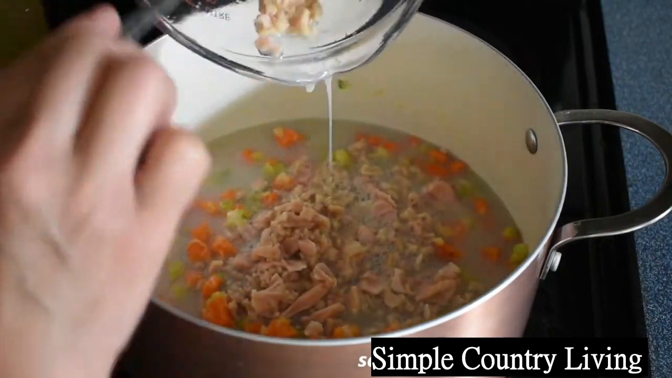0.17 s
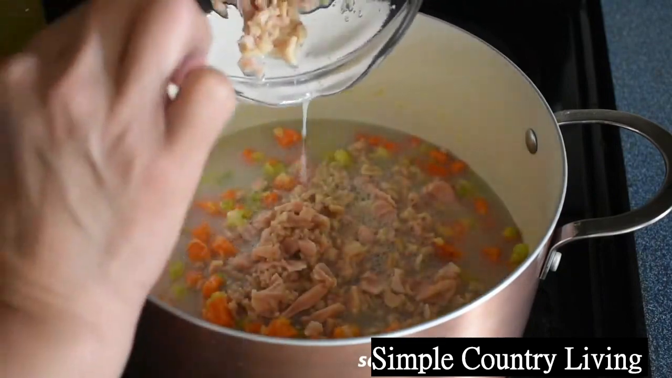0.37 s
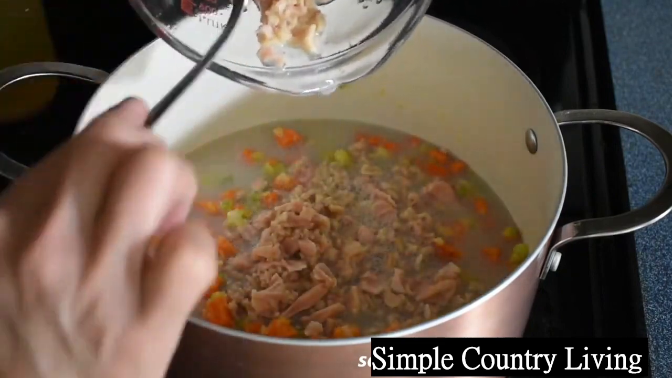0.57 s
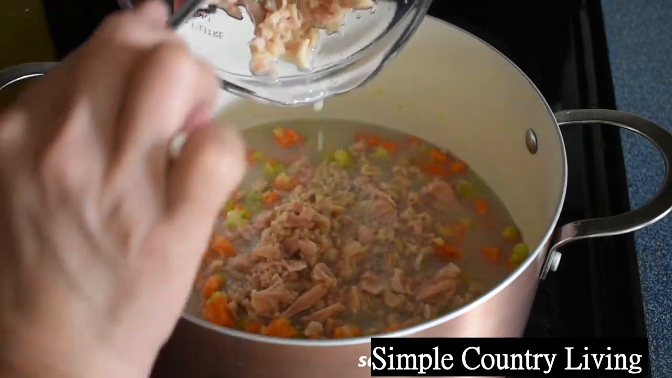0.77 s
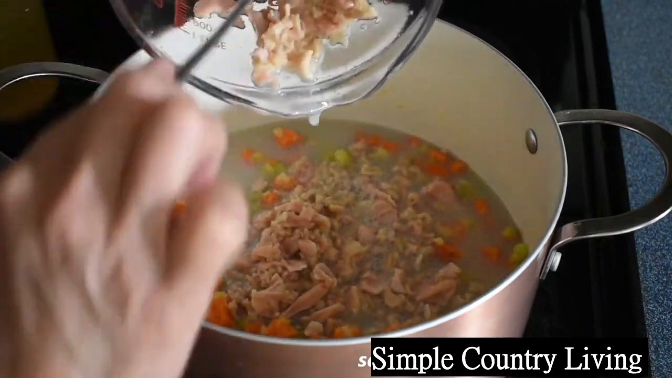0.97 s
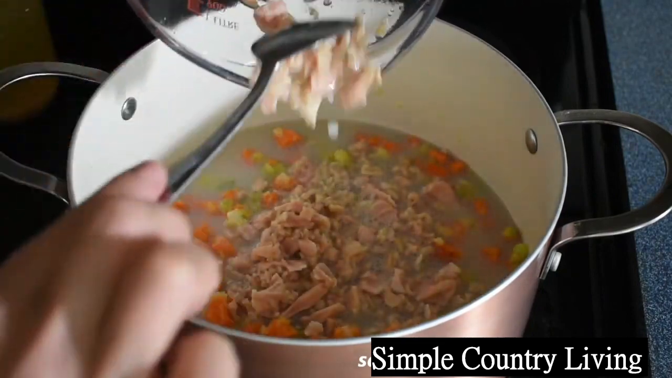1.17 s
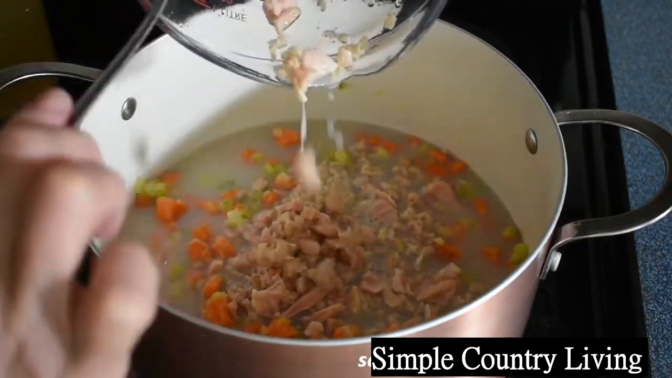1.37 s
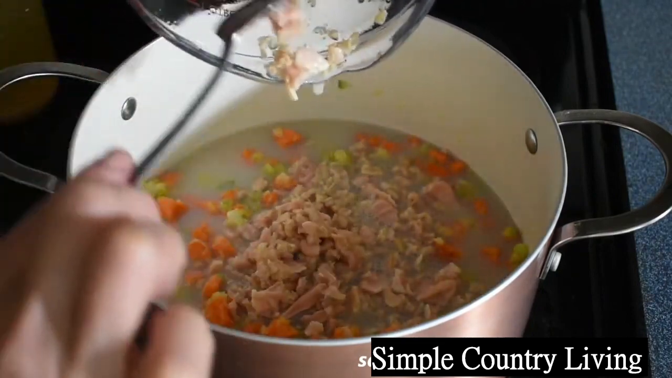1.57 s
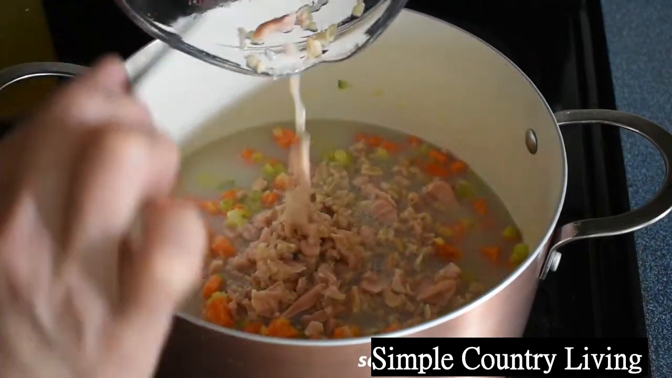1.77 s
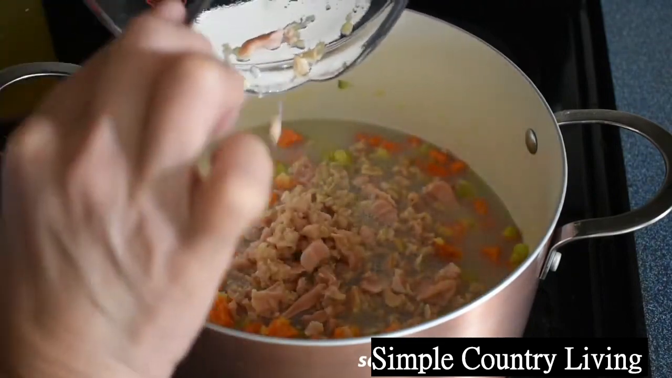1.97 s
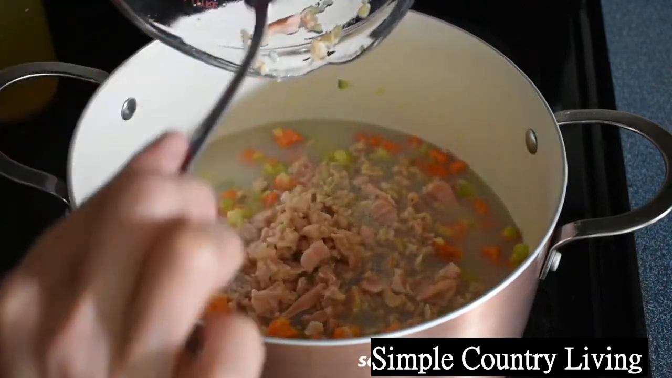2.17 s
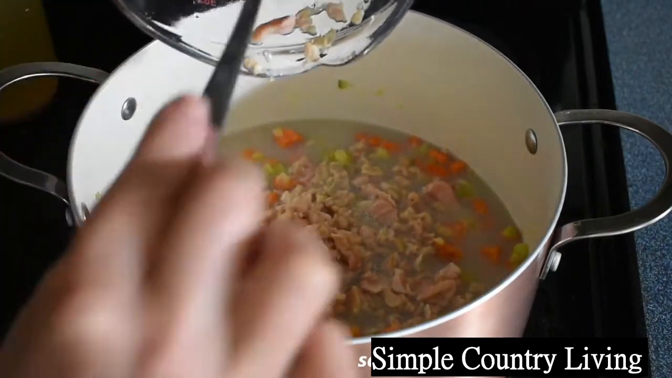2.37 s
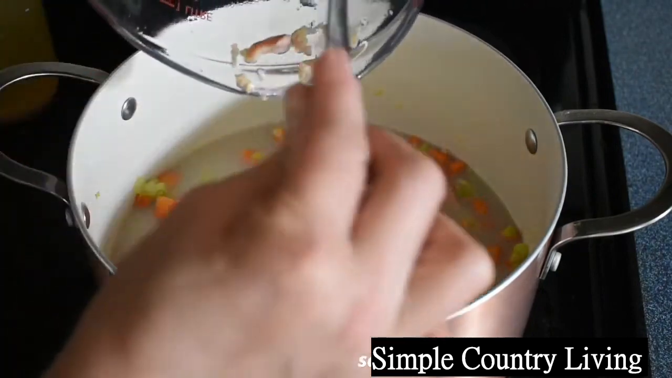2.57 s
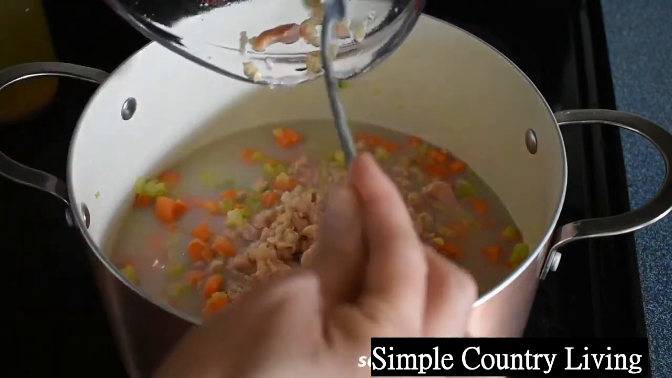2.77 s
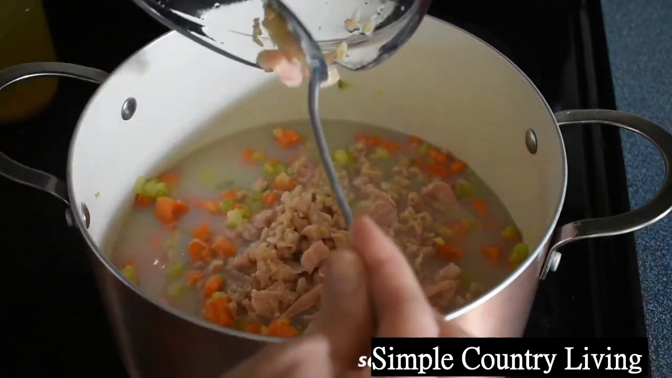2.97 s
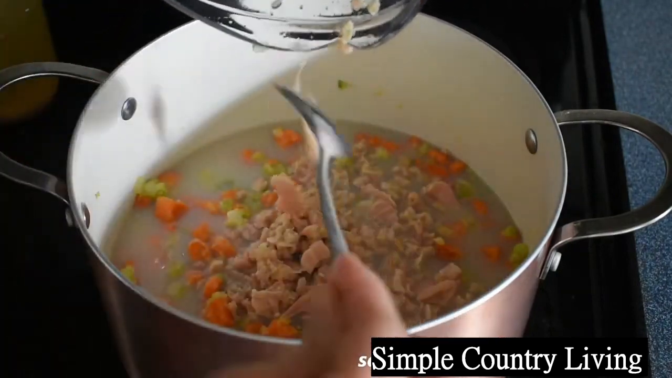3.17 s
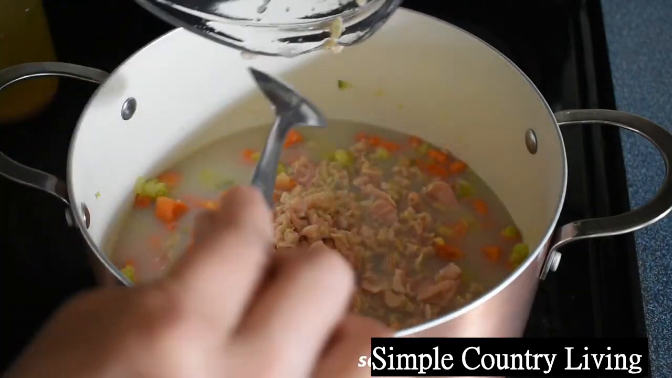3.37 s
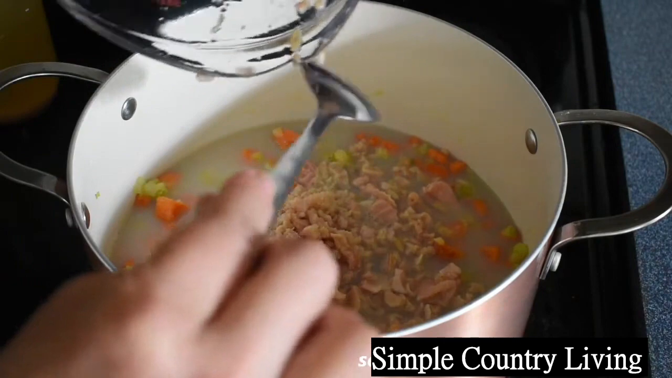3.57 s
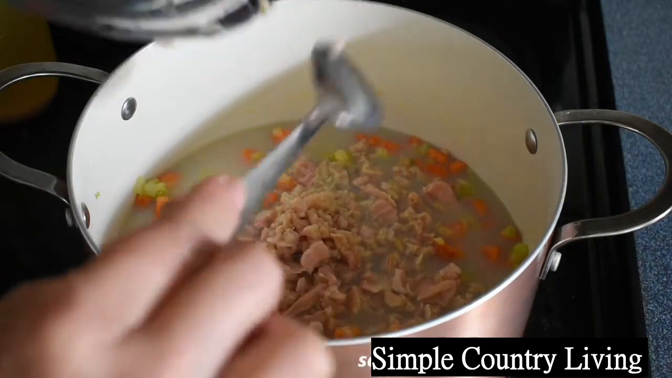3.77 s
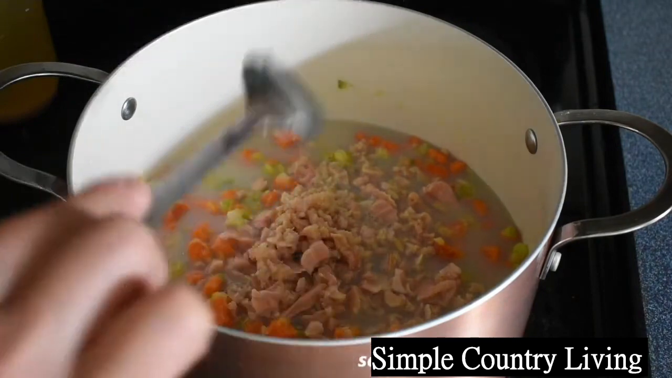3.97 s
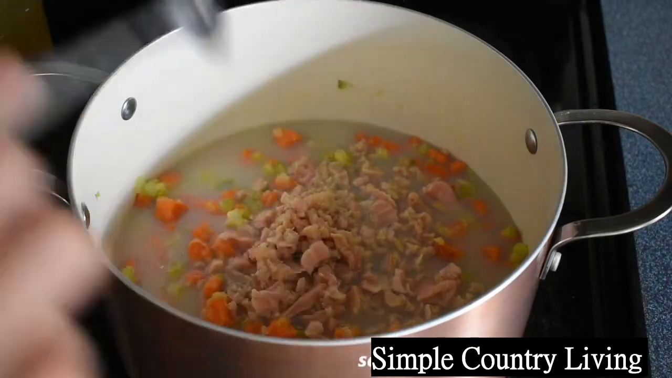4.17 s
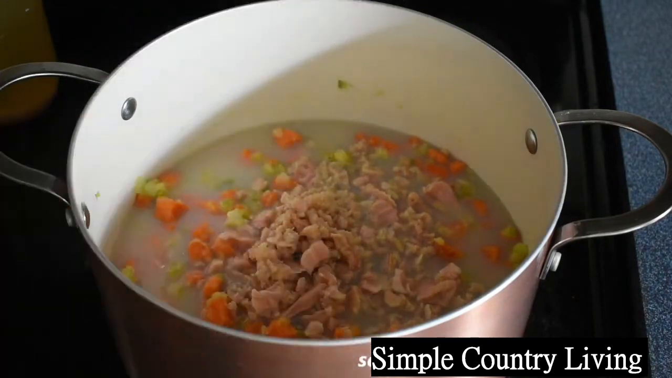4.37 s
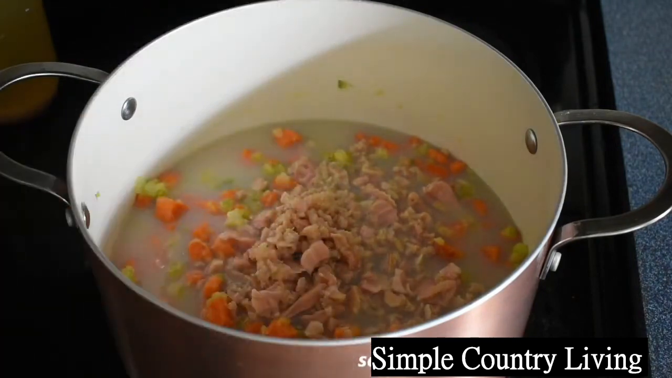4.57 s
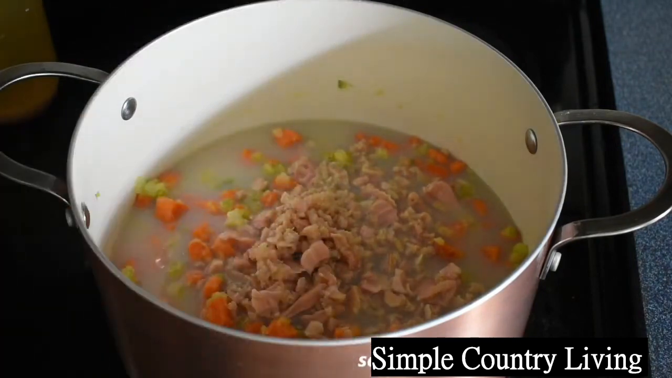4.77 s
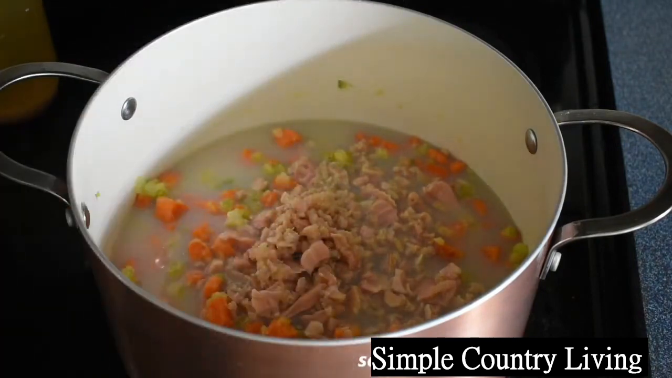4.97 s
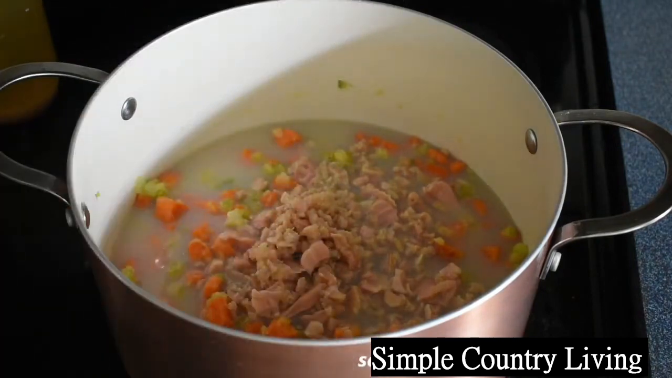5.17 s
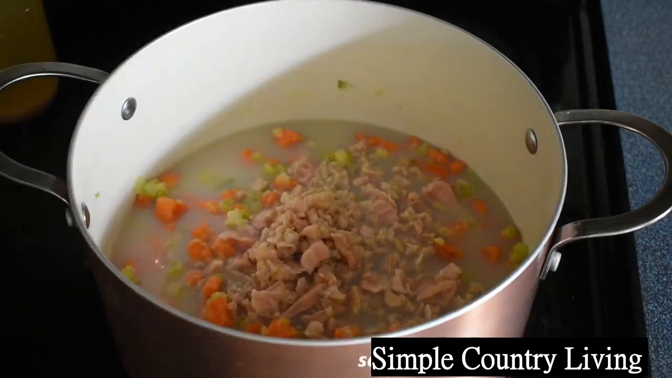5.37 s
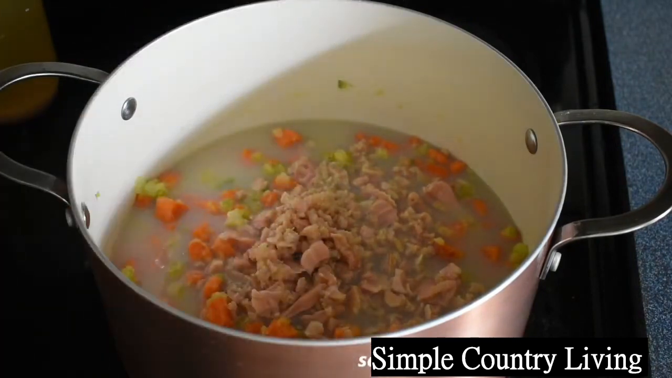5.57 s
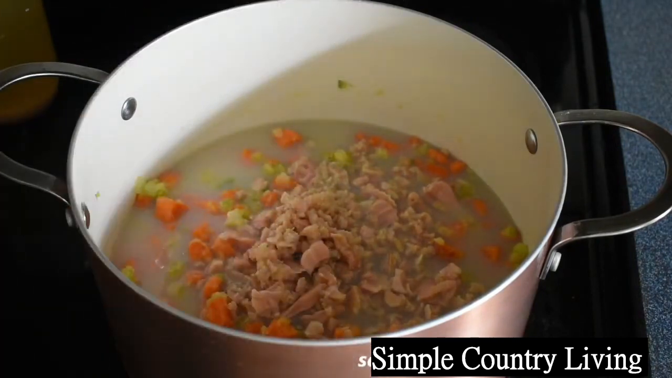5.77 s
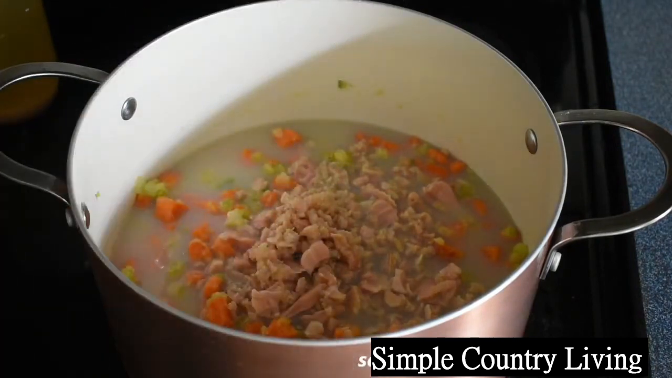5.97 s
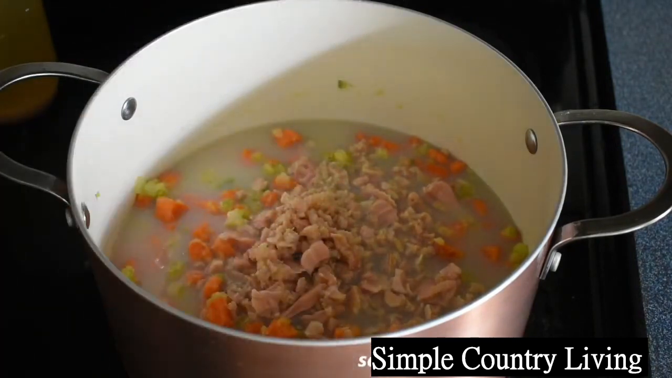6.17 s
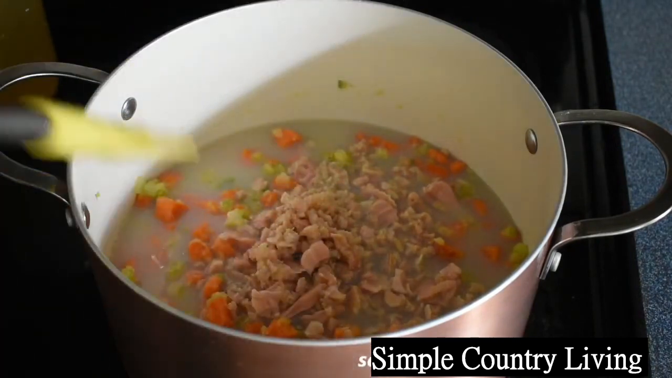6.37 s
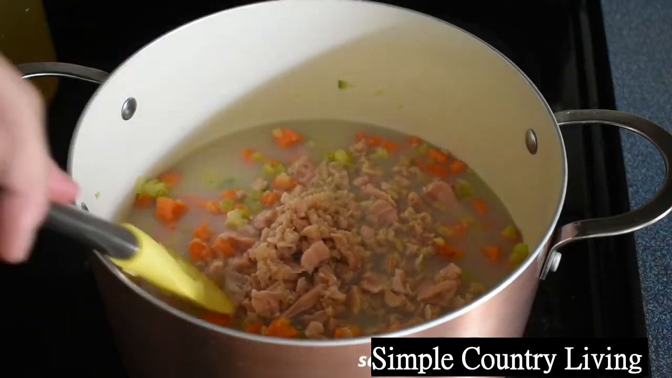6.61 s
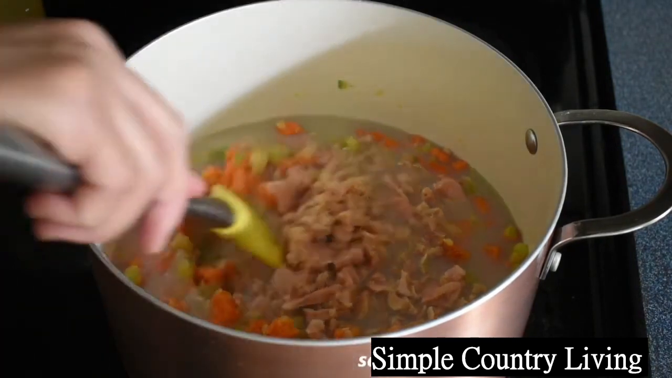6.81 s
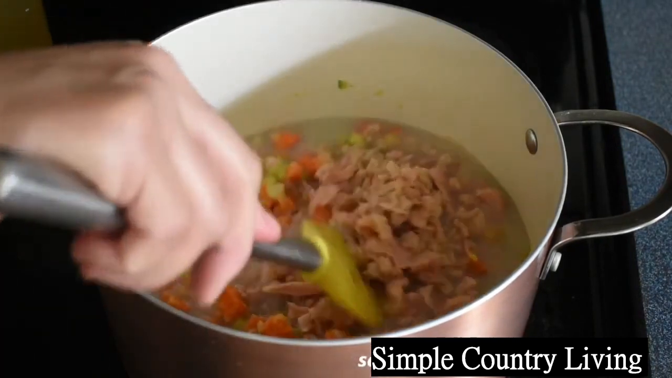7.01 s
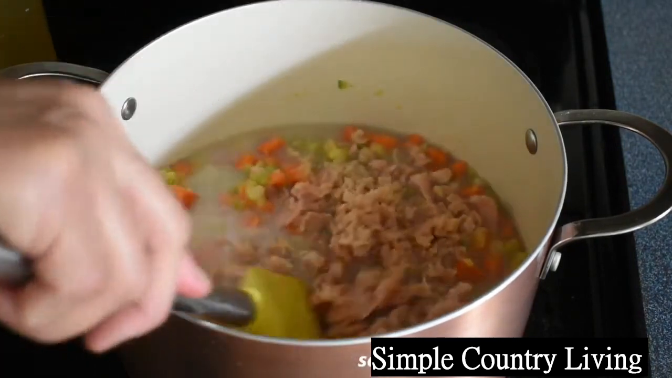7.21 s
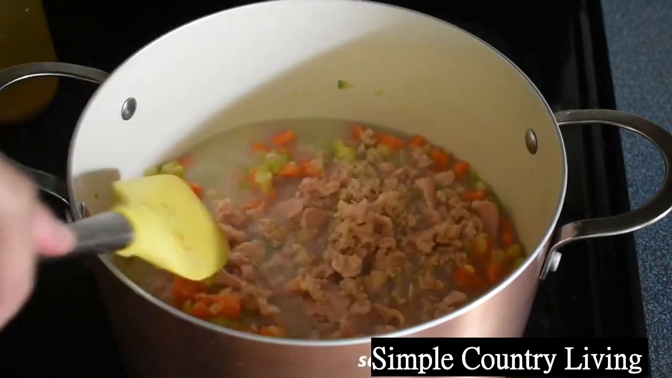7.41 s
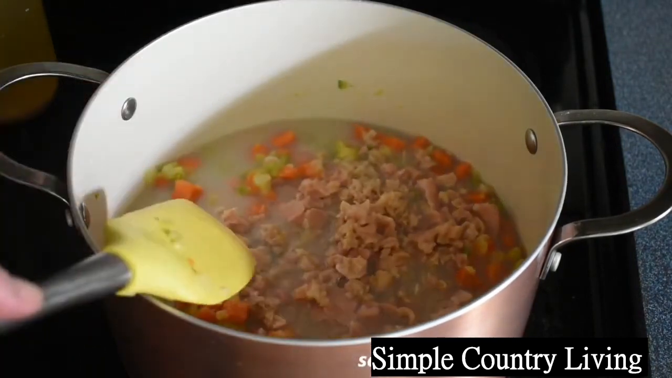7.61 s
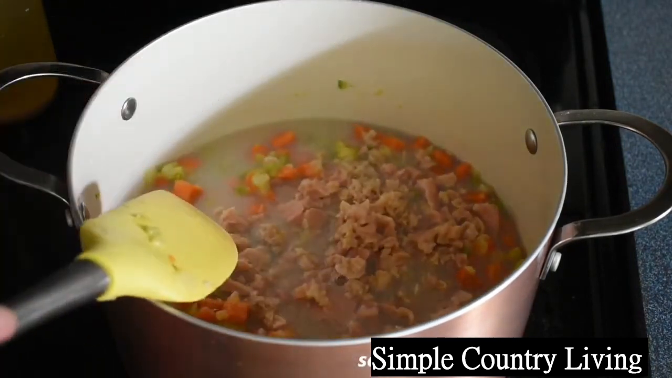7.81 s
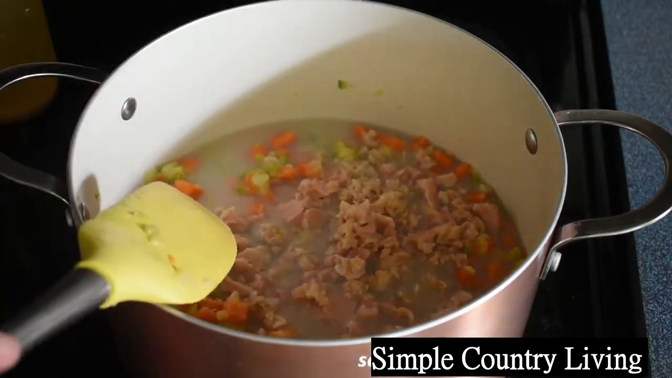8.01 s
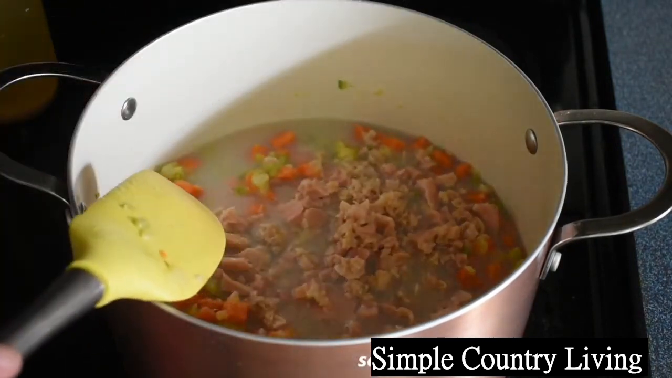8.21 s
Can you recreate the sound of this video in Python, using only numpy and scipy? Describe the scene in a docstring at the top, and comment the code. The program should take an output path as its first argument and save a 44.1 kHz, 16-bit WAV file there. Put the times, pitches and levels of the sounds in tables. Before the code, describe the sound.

A close microphone in a small, hard kitchen picks up quiet room tone and a very faint steady hum throughout. From 0.3 s a steel spoon taps a glass bowl with bright, quickly damped clinks, the main ones near 0.3, 0.8, 1.3, 1.9 and 2.4 s. Tiny gritty scrapes and squeaks fall between them, clustering around 0.4, 1.35 and 2.8-3.0 s, with a last lighter clink near 3.4. Near quiet follows until 4.77, when the spoon strikes the bowl with a bright ring, then slides down the glass, gritty and singing, swelling from 4.95 to 5.2. Faint brushing and dull worktop knocks begin at 5.5; a very hard, sharp knock at 6.1 jingles the loose spoon. From 6.5 to 7.0 muffled thuds mix with low, soft spatula bumps in the full pot and slight jingles. Weak bumps around 7.5-7.9 and faint brushing near 8 s finish it.

```python
"""A steel spoon clinks on a glass bowl and scrapes food out over a soup pot, close by in a small kitchen.
The dropped spoon then strikes the bowl and slides down its wall. Worktop knocks follow and jingle it,
among soft brushing; a spatula bumps the pot as stirring begins. Hum and room tone run throughout.
Struck bodies are sums of decaying modes plus noise; rubbing is stick-slip pulses and fluttering tones."""
import sys
import numpy as np
from scipy import signal
from scipy.fft import rfft, irfft
from scipy.io import wavfile
from scipy.ndimage import uniform_filter1d, minimum_filter1d

SR = 44100
rng = np.random.default_rng(int(sys.argv[2]) if len(sys.argv) > 2 else 0)


def generate_wav(signal):
    """Clip the signal to [-1, 1] and save it as 16-bit WAV at the path in sys.argv[1]."""
    frames = np.transpose(np.atleast_2d(signal))
    scaled = np.clip(frames, -1, 1) * 32767
    pcm = np.round(scaled).astype(np.int16)
    wavfile.write(sys.argv[1], SR, pcm)


N = 363825
RING_S = .6
T_S = np.arange(int(RING_S * SR)) / SR
STROKE_T_S = T_S - RING_S / 2  # zero at mid-buffer

# room tone colour: freq_hz, level_db
AIR_COLOUR = [(15, -57.5), (25, -19.5), (64, -7.5), (223, -6.5), (270, -8), (354, -5), (384, -6),
              (416, -11.5), (451, -9.5), (607, -9), (695, -9), (754, -10.5), (1020, -11.5), (4870, -18.5),
              (16000, -29)]
# room echo bands: freq_hz, level_db
ECHO_BANDS = [(150, -11), (500, -12.5), (1500, -9.5), (4000, -14), (10000, -15)]
# ring time of each echo band: t60_s
ECHO_T60_S = [.45, .48, .52, .41, .32]
# soft utensil brushing: centre_s, width_s, level_db, centre_hz
RUSTLES = [(5.623, 0.023, -55.5, 1260), (6.908, 0.01, -57, 2510), (7.102, 0.012, -59.5, 5040),
           (7.873, 0.017, -54, 1460), (8.024, 0.013, -59.5, 1767)]
# low modes of the full pot on its hob: freq_hz, level_db, t60_s
POT_MODES = [(74.4, -6, 0.25), (119.1, -1, 0.19), (134.7, -11.5, 0.075), (211.9, -1, 0.21),
             (250.5, -36, 0.15), (300, 6.5, 0.1), (340.4, 3, 0.22), (434, -6, 0.24)]
# soft bumps in the pot: start_s, level_db, contact_s
BUMPS = [(1.055, -59, 0.011), (6.466, -49.5, 0.017), (6.561, -44.5, 0.043), (6.81, -60, 0.049),
         (7.453, -50, 0.079), (7.665, -54, 0.031), (7.891, -65, 0.067)]
# worktop modes, heavily damped: freq_hz, level_db
WORKTOP_MODES = [(120, -14.5), (225, -1), (255, 4), (345, -3), (372, 6), (430, 6.5), (520, -6), (577, -6.5),
                 (653, 7.5), (730, 3.5), (800, -3.5), (930, 0), (1080, 0.5), (1150, 1), (1355, 0.5),
                 (1840, -3), (2230, -8)]
# knock noise colour: freq_hz, level_db
THUD_COLOUR = [(40, -26), (110, -1.5), (240, -2.5), (400, 10), (700, 11.5), (1200, 7), (2000, 2),
               (4000, -7), (8000, -29), (16000, -22.5)]
# spoon lying loose in the bowl: freq_hz, level_db, t60_s
LOOSE_SPOON_MODES = [(2610, 9, .11), (2890, 2, 0.15), (3585, 2, 0.11), (3870, -1.5, .1), (4450, -9, 0.13),
                     (4870, 3.5, .08), (5000, -2, .12), (5780, -5.5, 0.12), (6480, -8.5, 0.35),
                     (7144, -16.5, .25), (7820, 1, .12), (9170, -6.5, 0.25), (10110, -14, .14),
                     (10550, -9, .14), (10720, -8, .14), (12700, -16.5, .1), (13400, -15, .12)]
# worktop knocks: start_s, level_db, dull_above_hz, contact_s, jingle_db, favoured_hz, lift_db
KNOCKS = [(5.503, -51.5, 3500, 0.0037, -70, 2870, 5), (5.731, -55, 870, 0.0041, -73, 2870, 1),
          (5.9325, -33.5, 900, 0.0025, -76, 2870, -2), (5.943, -33, 490, 0.013, -79, 2870, 0),
          (6.0995, -5.5, 4670, 0.00021, -37, 3960, 12), (6.125, -28, 4000, 0.029, -33, 2610, -8.5),
          (6.557, -31.5, 800, 0.0039, -77, 2870, 6), (6.566, -21, 1196, 0.0053, -46.5, 4880, 0),
          (6.811, -33.5, 900, 0.0094, -59.5, 2870, 7), (6.829, -34.5, 600, 0.023, -70, 2870, -4),
          (6.93, -33.5, 1210, 0.015, -49, 3585, 8), (6.947, -26.5, 1160, 0.01, -45.5, 3585, 1),
          (6.974, -31.5, 904, 0.021, -54, 3585, 2), (8.015, -48.5, 2260, 0.01, -86.5, 2870, 1)]
# glass bowl: freq_hz, struck_db, free_t60_s, sliding_db
BOWL_MODES = [(1051, -7, 0.078, -20.5), (2566, -9.5, .11, -22), (2650, -11, .05, -22),
              (2832, -0.5, 0.13, -12.5), (3000, -4, .06, -24), (3313, -6.5, 0.041, -17),
              (4720, -8, 0.092, 0), (4895, -6.5, 0.083, -3.5), (4992, -1.5, 0.035, -18.5),
              (5650, -7, .06, 2), (6362, -14.5, 0.12, 1), (6540, -8.5, 0.12, -20), (7000, -16.5, .11, -2),
              (7950, -11.5, 0.19, 0.5), (8044, -5.5, 0.092, -13), (8650, -14, 0.18, -9.5),
              (8830, -7, .12, -7), (10096, -4.5, .06, -3), (10650, -13.5, 0.098, -2),
              (10300, -3.5, 0.23, -15), (11150, -2.5, 0.069, -2.5), (11230, -2.5, .06, -5),
              (11700, -6.5, .07, -3.5), (12100, -13.5, 0.29, -7), (12600, -11.5, 0.12, -11),
              (12554, -14.5, 0.36, -10), (13300, -6.5, 0.11, -16), (13800, -8.5, .04, -15),
              (16200, -13, .12, -17.5)]
# steel spoon: freq_hz, struck_db, free_t60_s, sliding_db
SPOON_MODES = [(590, -27.5, 0.074, -18), (1397, -24, 0.092, -23.5), (1812, -18, .11, -10),
               (1885, -5, 0.04, -28.5), (2370, -13, 0.086, -16.5), (2990, -10, .09, -27),
               (3326, -13, .1, -9), (4010, -17.5, .1, -17), (4510, -11.5, 0.069, -33),
               (5310, -6, .06, -21.5), (5396, -15.5, .14, -2), (6430, 2, 0.066, -20),
               (6310, -5.5, 0.069, -10), (7143, -7.5, 0.17, -10.5), (7288, -6.5, 0.2, -4.5),
               (8140, -1.5, 0.058, -16.5), (9400, -3, .04, -10.5), (9590, -12.5, 0.19, -9.5),
               (9860, -2.5, 0.043, -20), (11170, -4.5, 0.089, -20.5), (14300, -11, 0.27, -11.5),
               (15400, -12, .1, -6), (16000, -19.5, .08, -13)]
# steel-on-glass noise colour: freq_hz, level_db
CRACK_COLOUR = [(60, -15.5), (300, -26), (800, -5), (1800, 7.5), (3000, 7.5), (4000, 10), (5500, 11),
                (7500, 6), (10500, 5.5), (13000, -2.5), (16000, -11)]
# slide down the wall: time_s, friction_db, low_resonance_db, high_resonance_db
SLIDE_PATH = [(4.819, -35.5, -46.5, -42), (4.882, -55.5, -55.5, -55.5), (4.95, -41.5, -43.5, -39.5),
              (4.99, -31, -44, -27.5), (5.032, -27, -51, -30), (5.098, -23, -37, -35.5),
              (5.134, -26, -57, -37.5), (5.175, -21, -45.5, -50.5), (5.213, -30.5, -31, -33.5),
              (5.241, -43, -43, -46.5)]
# spoon pressed on the glass: freq_hz, level_db
PRESSED_MODES = [(1950, -10), (2900, 1.5), (3480, -6), (4200, -10.5), (5650, -2.5), (8350, -4),
                 (10450, -10), (11300, -7), (15000, -14.5)]
# strokes: peak_s, half_length_s, level_db, bowl_over_spoon_db, tilt_db_per_octave,
#          squeak_hz, glide_share_per_s, squeak_db
SCRAPES = [(0.332, 0.021, -51.5, -5, -4, 2340, -0.27, -43), (0.412, 0.01, -46, -18, 3, 1416, -0.54, -47),
           (0.432, 0.01, -38.5, -10, 1.5, 1340, -1, -46.5), (0.408, .012, -58, -5, 0, 5420, 1, -46.5),
           (0.441, 0.016, -55, -6, 0, 5600, 0.26, -38), (0.496, 0.013, -41, -3, -1, 2810, -1.8, -44),
           (0.901, 0.051, -58, -5, 1.5, 1415, 0.51, -55), (0.963, 0.014, -50.5, -9, -1.5, 1387, -0.55, -47),
           (1.075, 0.058, -70, 7.5, 2, 11200, -0.073, -62), (1.349, 0.02, -56, 11, -10, 3030, -1.46, -32),
           (1.354, 0.0067, -50, 2, 5, 10300, 0.46, -29.5), (1.404, 0.0074, -74, 3, -2, 2830, 0, -36),
           (1.48, 0.0081, -52, -7.5, -2, 4840, 0, -42.5), (1.996, 0.04, -51.5, -11, 5, 1425, 1.5, -54),
           (2.122, 0.07, -62.5, 2.5, 5, 11200, 0.33, -63),
           (2.738, 0.028, -66.5, 13.5, 4, 1650, -0.7, -59.5),
           (2.816, 0.019, -53, -6, -8, 1655, -0.39, -42.5), (2.827, 0.015, -55.5, 4, 2, 4900, .5, -37.5),
           (2.855, 0.018, -48, -1, -3.5, 1660, 1.1, -42.5), (2.856, 0.012, -50, 1.5, 1, 4910, 0.26, -29),
           (2.916, 0.013, -51, -26, -7, 1663, 3.3, -42), (2.917, 0.021, -61, 2, 3, 4900, -0.064, -38.5),
           (2.943, 0.0093, -37, -1, -4.5, 1634, 0.6, -40.5), (2.97, 0.02, -52, -2, 0.5, 5000, -0.25, -44),
           (2.995, 0.0082, -55, 6, 1, 1900, 0.75, -50), (3.064, 0.019, -70, 5.5, 1, 2804, 0.23, -52),
           (3.427, 0.03, -51, 7.5, 1.5, 10750, 0.21, -40)]
# blows on the bowl: start_s, level_db, spoon_over_bowl_db, tilt_db_per_octave, favoured_hz, lift_db
CLINKS = [(0.2866, -19.5, 18.5, -1, 7290, 4.5), (.428, -43.5, 8.5, 2, 8080, 9),
          (0.4463, -46, 2, 3, 4900, 15), (.469, -52, -0.5, 7, 5690, 9), (0.488, -55.5, -5, -4.5, 2850, 8),
          (0.76, -25.5, 11.5, 0, 7143, 21.5), (0.958, -48.5, 3.5, 1.5, 2850, 12.5),
          (1.27, -63.5, 5.5, 1.5, 6400, 13.5), (1.3007, -24, -12.5, -2, 4950, 20),
          (1.3526, -34, -27, -3, 4950, 20.5), (1.36, -44, -14.5, -9.5, 1050, -13),
          (1.382, -47, -6.5, -2, 2850, 22), (1.548, -55, -17.5, -3, 4917, 13),
          (1.781, -65.5, 2, 10.5, 11200, 4.5), (1.8625, -22, 13.5, 0, 11170, 11),
          (1.885, -37, 7, 7, 1890, 8), (2.049, -48.5, -0.5, 1.5, 5690, 16),
          (2.207, -65, -11, -2.5, 11290, 22.5), (2.4411, -22, -23.5, 0.5, 10713, 10.5),
          (2.462, -37, -6, -1, 11120, 11), (2.806, -52, 4, -3.5, 3010, 30), (2.909, -56, 8, 3, 3010, 32.5),
          (2.937, -44.5, 5.5, -3.5, 2850, 16.5), (2.949, -56.5, -20, -4.5, 2850, 26.5),
          (3.055, -56.5, -0.5, -6, 2850, 13.5), (3.375, -35, -4, 1.5, 11300, 13),
          (3.531, -58, -14.5, 4, 1049, 15.5), (3.558, -60.5, -2, -7, 1049, -1),
          (4.7663, -22.5, 15.5, -0.5, 7290, 23), (4.824, -47.5, -19, 1.5, 2860, 16.5),
          (5.025, -40, -10, 1.5, 4917, 22.5)]

TOP_HZ, LIMITER_CEILING = 15900, .58
PIVOT_HZ = 5650  # mode tilts turn about this
AIR_DB = -64
WORKTOP_T60_S, THUD_T60_S = .07, .042
RATTLE_DB, RATTLE_T60_S = 1, .05  # noise of the jolted spoon, over its modes
GRIT_T60_S, CRACK_T60_S = .03, .013  # noise of one slip, of one blow
SLIDE_LOW_HZ, SLIDE_HIGH_HZ = 2860, 4890  # singing bowl resonances
SLIDE_SHARPNESS = 120  # pitch / flutter cutoff
SLIDE_TILT_DB_PER_OCTAVE, SLIDE_BRIGHTENS_DB_PER_OCTAVE_PER_S = -1, 6  # tilt at midway; its rise
SLIDE_GRIT_DB = -.5  # noise over modes
SLIDE_LOWEST_HZ = 330  # skid noise cut below this
SLIDE_RING_SHARE = .75  # of the free t60, while rubbing
SCRAPE_GRIT_DB = -2  # noise over bowl modes
PRESSED_SHIFT_SHARE = .018  # scatter of mode pitch between strokes
GLIDE_LIMIT_HZ = 2420  # modes above glide no faster than this one
SQUEAK_STEADY, PRESSED_STEADY = .9, .5  # steady tone over flutter
CRACK_OVER_RING_DB = 4
THUMP_DB, THUMP_T60_S = -2.5, .055
THUMP_LOW_HZ, THUMP_HIGH_HZ = 130, 802


def amp(db):
    """Decibels to gain."""
    return 10 ** (np.asarray(db) / 20)


def fade(t60_s):
    """Exponential decay, down 60 dB at t60."""
    return amp(-60 * T_S / t60_s)


def unit(x):
    """Scale to an energy of one."""
    return x / np.sqrt(np.sum(x ** 2))


def add(out, start_s, x):
    """Mix x into out from start_s, cut at the end."""
    i = max(int(start_s * SR), 0)
    out[i:i + len(x)] += x[:len(out) - i]


def noise(colour, size, tilt=0):
    """Coloured noise of rms one; the dB/octave tilt acts above 1024 Hz."""
    hz, db = np.transpose(colour)
    octave = np.log2(np.maximum(np.fft.rfftfreq(size, 1 / SR), 1))
    gain = amp(np.interp(octave, np.log2(hz), db) + tilt * np.maximum(octave, 10))
    x = irfft(rfft(rng.standard_normal(size)) * gain, size)
    return x / x.std()


def butter(x, hz, kind, order=2):
    """Butterworth filter, corners held to TOP_HZ."""
    sos = signal.butter(order, np.minimum(hz, TOP_HZ), kind, fs=SR, output="sos")
    return signal.sosfilt(sos, x)


def ring(modes, tilt=0, favoured_hz=1, lift_db=0, detune=0, scatter_db=-0.5, reach_hz=70):
    """Decaying modes after one touch; the contact place favours those near one frequency."""
    hz, db, t60_s, *_ = np.transpose(modes)
    lift = lift_db * np.exp(-((hz - favoured_hz) / reach_hz) ** 2)
    db = db + tilt * np.log2(hz / PIVOT_HZ) + lift
    gain = amp(db + scatter_db * rng.standard_normal(len(hz))) * rng.choice([-1, 1], len(hz))
    hz = hz * (1 + detune * rng.standard_normal(len(hz)))
    t = T_S.astype(np.float32)
    out = 0
    for f, g, d in zip(hz, gain, t60_s):
        decay = np.exp(np.float32(-np.log(1000) / d) * t)
        out = out + g * np.sin(np.float32(2 * np.pi * f) * t) * decay
    return out


def push(contact_s, chatter_db):
    """Force of a first push, then chatter while the contact settles."""
    force = amp(chatter_db) * rng.standard_normal(len(T_S)) * np.exp(-T_S / contact_s)
    force[0] = 1
    return unit(force)


def slips(per_s=1800, uneven_db=0.0):
    """Stick-slip of the spoon's edge: random tiny blows, rms one."""
    blows = (rng.random(len(T_S)) < per_s / SR) * rng.choice([-1, 1], len(T_S))
    blows = blows * amp(uneven_db * np.minimum(rng.exponential(size=len(T_S)), 4))
    return blows / blows.std()


def sing(pressure, hz, glide_hz_per_s=0, sharpness=40, steady=0):
    """Friction-held resonance: a gliding steady tone with narrowband flutter."""
    raw = rng.standard_normal(len(T_S)) + 1j * rng.standard_normal(len(T_S))
    flutter = butter(raw, hz / sharpness, "low")
    cycles = hz * STROKE_T_S + glide_hz_per_s * STROKE_T_S ** 2 / 2
    tone = np.real((steady + flutter / flutter.std()) * np.exp(2j * np.pi * cycles))
    return unit(tone * pressure) * np.linalg.norm(pressure)


def room_tone(hum_hz=421.0, hum_db=-73):
    """Quiet air noise with the thin sine hum of an appliance."""
    hum = amp(hum_db) * np.sin(2 * np.pi * hum_hz * np.arange(N) / SR)
    return amp(AIR_DB) * noise(AIR_COLOUR, N) + hum


def kitchen(x, build_s=0.0017):
    """Diffuse echo of a small hard room: noise bands, each with its own decay; the treble dies first."""
    hz, db = np.transpose(ECHO_BANDS)
    log_hz = np.log(np.maximum(np.fft.rfftfreq(len(T_S), 1 / SR), 1))
    white, tail = rfft(rng.standard_normal(len(T_S))), 0
    for share, t60_s, level_db in zip(np.eye(len(hz)), ECHO_T60_S, db):
        band = irfft(white * np.interp(log_hz, np.log(hz), share), len(T_S))
        envelope = unit(fade(t60_s) * (1 - np.exp(-(T_S / build_s) ** 2)))
        tail = tail + amp(level_db) * band * envelope
    return signal.fftconvolve(x, tail)[:N]


def rustles(grain_db=3):
    """Soft brushing: grainy band noise under short swells."""
    out, t = np.zeros(N), np.arange(N) / SR
    for centre_s, width_s, db, hz in RUSTLES:
        grains = rng.standard_normal(N) * amp(grain_db * rng.exponential(size=N))
        swish = butter(grains, [hz / 2, hz * 2], "band", order=1)
        out += amp(db) * swish / swish.std() * np.exp(-((t - centre_s) / width_s) ** 2)
    return out


def bumps():
    """Soft pushes reach only the pot's lowest modes."""
    out = np.zeros(N)
    for start_s, db, contact_s in BUMPS:
        force = push(contact_s, chatter_db=-22.5)
        add(out, start_s, amp(db) * signal.fftconvolve(force, ring(POT_MODES, detune=0.013)))
    return out


def knocks(body_db=-12, thud_db=1, lowest_hz=85, tilt=0.5):
    """Dull worktop blows; the same push jingles the loose spoon at a level set per knock."""
    out, modes = np.zeros(N), [(hz, db, WORKTOP_T60_S) for hz, db in WORKTOP_MODES]
    for start_s, db, dull_hz, contact_s, jingle_db, favoured_hz, lift_db in KNOCKS:
        thud = amp(thud_db) * noise(THUD_COLOUR, len(T_S)) * fade(THUD_T60_S)
        body = amp(body_db) * ring(modes, detune=0.024) + thud
        rattle = amp(RATTLE_DB) * noise(CRACK_COLOUR, len(T_S)) * fade(RATTLE_T60_S)
        jingle = ring(LOOSE_SPOON_MODES, tilt, favoured_hz, lift_db, scatter_db=2.5) + rattle
        sound = amp(db) * butter(body, dull_hz, "low", order=1) + amp(jingle_db) * jingle
        add(out, start_s, signal.fftconvolve(push(contact_s, chatter_db=-17), sound))
    return butter(out, lowest_hz, "high")


def rub(force, travel, contacts):
    """Drive contact places in turn, crossfaded at constant power, as travel goes from -1 to 1."""
    places = np.linspace(-1, 1, len(contacts))
    out = 0
    for share, contact in zip(np.eye(len(contacts)), contacts):
        local_force = force * np.sqrt(np.interp(travel, places, share))
        out = out + signal.fftconvolve(local_force, contact)
    return out


def slide(detune=0.0011, count=7):
    """Loose spoon skids down the glass, brighter as it speeds up; two bowl resonances sing."""
    out, (time_s, *levels) = np.zeros(N), np.transpose(SLIDE_PATH)
    # silent after the last point
    friction, low, high = (amp(np.interp(time_s[0] + T_S, time_s, db, right=-np.inf)) for db in levels)
    half_s = (time_s[-1] - time_s[0]) / 2
    modes = [(hz, sliding_db, t60_s * SLIDE_RING_SHARE)
             for hz, _, t60_s, sliding_db in BOWL_MODES + SPOON_MODES]
    offsets_s = np.linspace(-half_s, half_s, count)
    contacts = []
    for tilt in SLIDE_TILT_DB_PER_OCTAVE + SLIDE_BRIGHTENS_DB_PER_OCTAVE_PER_S * offsets_s:
        grit = amp(SLIDE_GRIT_DB) * noise(CRACK_COLOUR, len(T_S), tilt) * fade(GRIT_T60_S)
        contacts.append(unit(ring(modes, tilt, detune=detune, scatter_db=2.5) + grit))
    skid = rub(slips(per_s=2200, uneven_db=5) * friction, T_S / half_s - 1, contacts)
    add(out, time_s[0], butter(skid, SLIDE_LOWEST_HZ, "high"))
    add(out, time_s[0], sing(low, SLIDE_LOW_HZ, sharpness=SLIDE_SHARPNESS))
    add(out, time_s[0], sing(high, SLIDE_HIGH_HZ, glide_hz_per_s=-150, sharpness=SLIDE_SHARPNESS))
    return out


def scrapes(sharpness=60, squeak_sharpness=55):
    """Strokes swell and fade; pressed-spoon modes glide as the contact moves, bowl modes stay put."""
    out = np.zeros(N)
    for peak_s, width_s, db, bowl_db, tilt, squeak_hz, glide, squeak_db in SCRAPES:
        pressure = np.exp(-(STROKE_T_S / width_s) ** 2)
        grit = amp(SCRAPE_GRIT_DB) * noise(CRACK_COLOUR, len(T_S), tilt) * fade(GRIT_T60_S)
        bowl = signal.fftconvolve(slips() * pressure, unit(ring(BOWL_MODES, tilt) + grit))
        spoon = 0
        for hz, mode_db in PRESSED_MODES:
            hz = hz * (1 + PRESSED_SHIFT_SHARE * rng.standard_normal())
            mode_pressure = amp(mode_db + tilt * np.log2(hz / PIVOT_HZ)) * pressure
            glide_hz_per_s = glide * min(hz, GLIDE_LIMIT_HZ)
            spoon = spoon + sing(mode_pressure, hz, glide_hz_per_s, sharpness, PRESSED_STEADY)
        squeak = sing(amp(squeak_db) * pressure, squeak_hz, glide * squeak_hz,
                      squeak_sharpness, SQUEAK_STEADY)
        start_s = peak_s - RING_S / 2
        add(out, start_s, amp(db + bowl_db) * bowl)
        add(out, start_s, amp(db) * spoon + squeak)
    return out


def touch(db, spoon_over_bowl_db, tilt, favoured_hz, lift_db):
    """Steel meets glass: both share the blow and ring over a short crack of damped modes."""
    bowl = ring(BOWL_MODES, tilt, favoured_hz, lift_db)
    spoon = amp(spoon_over_bowl_db) * ring(SPOON_MODES, tilt, favoured_hz, lift_db)
    crack = amp(CRACK_OVER_RING_DB) * noise(CRACK_COLOUR, len(T_S), tilt) * fade(CRACK_T60_S)
    return amp(db) * ((bowl + spoon) / np.hypot(1, amp(spoon_over_bowl_db)) + crack)


def clinks(held_db=-4, swing_db=4, settle_s=0.0105, contact_s=0.00013):
    """Spoon blows, first swing damped by lasting contact; each also jolts the hand-held bowl (thump)."""
    out = np.zeros(N)
    onset = 1 - np.exp(-T_S / contact_s)
    damping = (amp(held_db) + amp(swing_db) * np.exp(-T_S / settle_s)) * onset
    for start_s, db, *blow in CLINKS:
        burst = rng.standard_normal(len(T_S)) * fade(THUMP_T60_S)
        thump = butter(burst, [THUMP_LOW_HZ, THUMP_HIGH_HZ], "band", order=1)
        add(out, start_s, damping * touch(db, *blow) + amp(db + THUMP_DB) * thump)
    return out


def scene():
    """All the handling, its echo and the room tone, in one channel."""
    direct = rustles() + bumps() + knocks() + slide() + scrapes() + clinks()
    return (room_tone() + kitchen(direct) + direct)[None]


def record(dry):
    """A fast limiter holds down the hardest blows; a steep low-pass cuts the top."""
    wanted = LIMITER_CEILING / np.maximum(np.abs(dry), LIMITER_CEILING)
    gain = uniform_filter1d(minimum_filter1d(wanted, size=130), size=65)  # samples
    low_pass = signal.ellip(10, .2, 80, TOP_HZ, fs=SR, output="sos")
    return signal.sosfilt(low_pass, dry * gain)


dry = scene()
out = record(dry)
generate_wav(out)
```